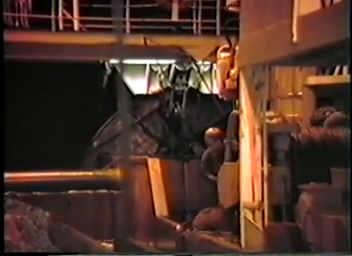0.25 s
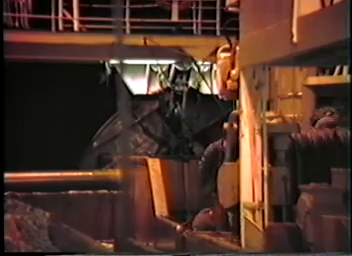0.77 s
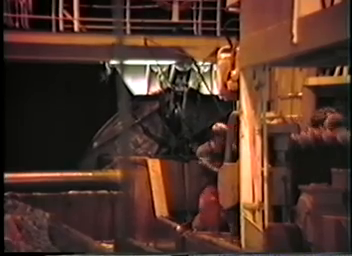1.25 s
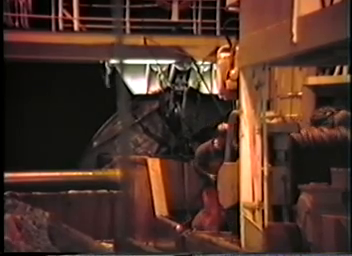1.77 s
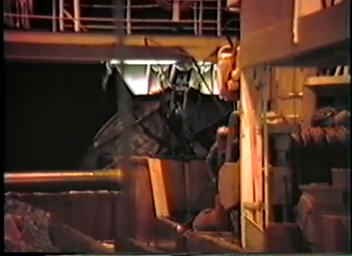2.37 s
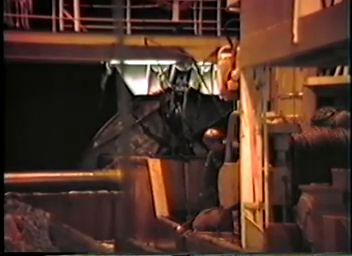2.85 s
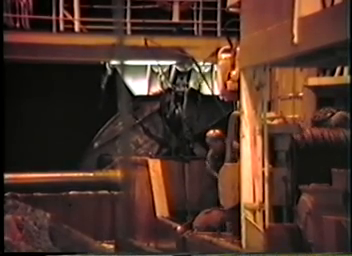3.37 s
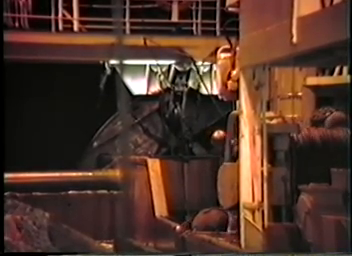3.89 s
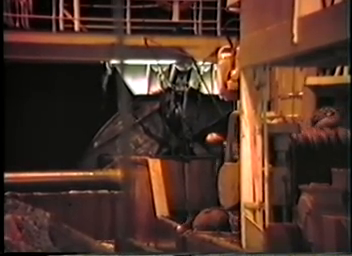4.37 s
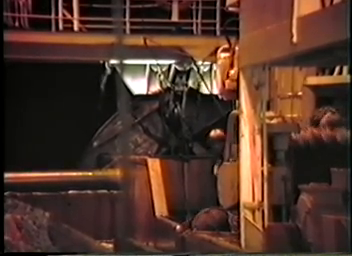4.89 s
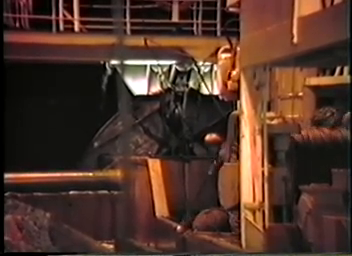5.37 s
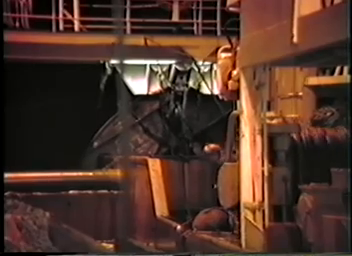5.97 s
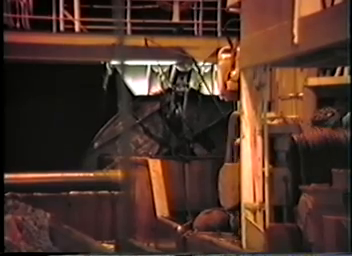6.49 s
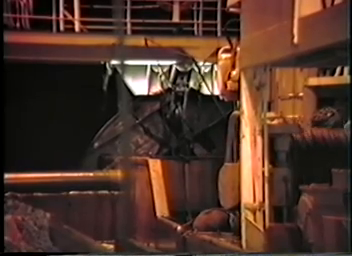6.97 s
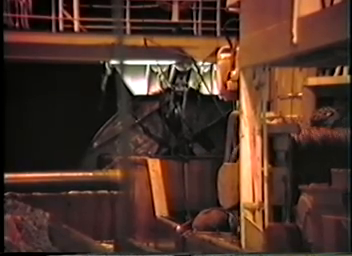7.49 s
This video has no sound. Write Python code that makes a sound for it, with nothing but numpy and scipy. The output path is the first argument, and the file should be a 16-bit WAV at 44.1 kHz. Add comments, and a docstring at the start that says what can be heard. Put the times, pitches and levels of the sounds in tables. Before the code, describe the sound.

Continuous loud ship machinery from start to end: low-mid, pipe-like exhaust throbs in a quick regular beat, with rattling clatter and cylinder rasp, shaft and gear hum, rushing air and ringing metal around them. A high, wavering pump whine pulses slightly slower than the engine. The throb grows slightly until three seconds, then eases. A few tiny ticks of loose gear barely poke through. Captured in mono from one spot on deck, slightly compressed.

```python
"""The working deck of a trawler at night, heard from one spot on deck for nearly eight seconds.
From the start the diesel throbs about four times a second, each cycle the same run of tone-and-noise puffs and
clatter. Shaped noise makes the ventilation and winch roar, bands of noise the ringing steel, and a wavering sine
the hydraulic pump, swelling three times a second. Loose gear ticks once early, once near four seconds and three
times after six, as short noise bursts. The diesel's puffs strengthen a little until three seconds, then ease off."""
import sys
import numpy as np
from scipy import signal
from scipy.fft import rfft, irfft, next_fast_len
from scipy.io import wavfile
from scipy.ndimage import uniform_filter1d, minimum_filter1d

SR = 44100
rng = np.random.default_rng(int(sys.argv[2]) if len(sys.argv) > 2 else 0)


def dump_mix(stems):
    """Bounce the given channels to the path in sys.argv[1] as a 16-bit WAV at rate SR."""
    frames = np.atleast_2d(stems).T  # one column per channel
    limited = np.clip(frames, -1, 1)  # hard clip at full scale
    pcm = np.round(limited * 32767).astype(np.int16)
    wavfile.write(sys.argv[1], SR, pcm)


N = 341334

# One engine cycle, and the time of the first heavy puff.
CYCLE_S, FIRST_THROB_S = 0.2403, 0.1248


def from_db(db):
    """Decibels to gain."""
    return 10 ** (np.asarray(db) / 20)


def seconds():
    """The time of every sample."""
    return np.arange(N) / SR


def rms_one(x):
    """Scale to an rms of 1."""
    return x / np.sqrt(np.mean(x ** 2) + 1e-20)


def sine(phase):
    """A sine of rms 1 from its phase in radians."""
    return np.sqrt(2) * np.sin(phase)


def drift(rate_hz):
    """Slow chance with a spread of 1, changing about rate_hz times a second."""
    points, step = 4096, 100  # one point every 100 samples
    hz = np.fft.rfftfreq(points, step / SR)
    slow = irfft(rfft(rng.standard_normal(points)) / (1 + (hz / rate_hz) ** 2))
    return np.interp(np.arange(N) / step, np.arange(points), rms_one(slow))


def colour(white, spectrum):
    """Give white noise of rms 1 a spectrum in dB per Hz."""
    hz = np.maximum(np.fft.rfftfreq(len(white), 1 / SR), 1)
    points_hz, points_db = np.transpose(spectrum)
    gain = from_db(np.interp(np.log(hz), np.log(points_hz), points_db)) * np.sqrt(SR / 2)
    return irfft(rfft(white) * gain, len(white))


def band(x, low_hz, high_hz):
    """Band-pass between two frequencies."""
    edges = [low_hz, min(high_hz, SR / 2 - 1)]
    return signal.sosfilt(signal.butter(2, edges, "band", fs=SR, output="sos"), x + 1e-18)


def clicks(times, sizes):
    """Single-sample impulses at the given times."""
    out = np.zeros(N)
    at = np.round(times * SR).astype(int)
    inside = (at >= 0) & (at < N)
    out[at[inside]] = sizes[inside]
    return out


# Puffs and knocks of one engine cycle, before the load changes them. Each row: time in seconds from the
# heaviest puff, pitch in Hz, peak level in dB, rise in seconds.
PUFFS = [(-.092, 413, -19, .009), (-.085, 265, -25.5, .010), (-.075, 141, -24, .008),
         (-.060, 141.5, -27, 0.0097), (-.043, 270, -20.5, 0.0085), (-.023, 171.6, -29, 0.0076),
         (-.019, 396, -14.5, 0.00694), (-.013, 719, -18, 0.00591), (-.010, 79.5, -34, .014),
         (-.003, 135, -24, 0.0087), (0, 275.7, -9, 0.00761), (.020, 139, -22.5, 0.00885),
         (.020, 404, -16, 0.00546), (.039, 92, -24.5, 0.02176), (.079, 283, -24.5, 0.00894),
         (.112, 101.3, -32.5, 0.0156)]
# How hard the engine pulls. Each row: time in seconds, strength of the puffs in dB.
ENGINE_LOAD = [(0, -0.6), (3, .7), (7.7, -1.4)]
THROB_SCATTER_DB = .5  # no two cycles burn quite alike


def exhaust(uneven_db, rough):
    """Each puff is a pipe tone and turbulent gas that swell and die; the run repeats every engine cycle."""
    times = np.arange(FIRST_THROB_S, N / SR + CYCLE_S, CYCLE_S)
    load_db = np.interp(times, *np.transpose(ENGINE_LOAD))
    strength_db = load_db + THROB_SCATTER_DB * rng.standard_normal(len(times))
    t = np.arange(SR // 8) / SR
    out = np.zeros(N)
    for offset, hz, peak_db, rise in PUFFS:
        # reaches 1 after the rise, so each stroke starts that much early
        swell = (t / rise * np.exp(1 - t / rise)) ** 3
        sizes = from_db(peak_db + strength_db + uneven_db * rng.standard_normal(len(times)))
        strokes = clicks(times + offset - rise, sizes)
        # turbulent gas makes every stroke a little different
        gas = rough * rms_one(band(rng.standard_normal(N), hz * 0.81, hz * 1.36))
        out += signal.oaconvolve(strokes, swell * np.sin(2 * np.pi * hz * t))[:N]
        out += signal.oaconvolve(strokes, swell)[:N] * gas
    return out


# Resonances of the exhaust pipe, ringing on between puffs. Each row: pitch in Hz, width in Hz,
# level in dB against the puffs.
PIPE = [(97.6, 5.3, -9.5), (256.7, 15.3, 3), (297, 4.5, -3.5), (333.4, 17, 3.5)]


def pipe(puffs):
    """The puffs together with the ringing that they leave in the pipe."""
    out = puffs
    for hz, width, level_db in PIPE:
        ringing = signal.lfilter(*signal.iirpeak(hz, hz / width, fs=SR), puffs)
        out = out + from_db(level_db) * ringing
    return out


# The rest of the cycle's clatter, before its level and surge. Each row: frequency in Hz, density in dB per Hz.
VALVE_CLATTER = [(30, -76), (50, -61), (70, -62), (95, -53), (140, -50), (180, -47), (260, -48.5),
                 (340, -43), (500, -52.6), (780, -46), (1100, -71), (2000, -72), (4000, -91.5),
                 (8000, -112)]


def clatter(level_db, surge_db):
    """Valves and pistons make the same dense clatter in every cycle, loudest round the heavy puff."""
    size = round(CYCLE_S * SR)
    # flat spectrum, random phases: one cycle of noise that joins its own start
    even = rms_one(irfft(np.exp(2j * np.pi * rng.random(size // 2 + 1)), size))
    one_cycle = colour(even, VALVE_CLATTER)
    load = np.cos(2 * np.pi * (seconds() - FIRST_THROB_S) / CYCLE_S)
    return np.resize(one_cycle, N) * from_db(level_db + surge_db * load)


# Shaft and gear tones. Each row: multiple of the cycle rate, rms level in dB before it wavers.
SHAFT_ORDERS = [(12, -49), (17, -49), (23, -38), (30, -42), (34, -39), (192, -31), (226, -36), (452, -44)]


def shafts(waver_db):
    """Tones locked to the engine's speed, wavering a little in strength."""
    turns = seconds() / CYCLE_S
    out = np.zeros(N)
    for order, level_db in SHAFT_ORDERS:
        level = from_db(level_db + waver_db * drift(1.16))
        out += level * sine(2 * np.pi * (order * turns + rng.random()))
    return out


CYLINDERS = 6


def firings(level_db, low_hz, high_hz, lead_s, surge_db):
    """Every cylinder fires once a cycle with a short rasp, roughest just before the heavy puff."""
    turn = 2 * np.pi * (seconds() - FIRST_THROB_S + lead_s) / CYCLE_S
    gate = (.5 + .5 * np.cos(CYLINDERS * turn)) * from_db(surge_db * np.cos(turn))
    return from_db(level_db) * rms_one(gate * band(rng.standard_normal(N), low_hz, high_hz))


# Ventilation and winch machinery, before level and flutter. Each row: frequency in Hz, density in dB per Hz.
DECK_ROAR = [(20, -71.6), (36, -71), (50, -78), (130, -56), (215, -59), (400, -47), (780, -45),
             (1050, -50.5), (1900, -55), (2600, -61), (4100, -66.5), (5400, -83.5), (8000, -92),
             (14000, -99)]
# Ducts and plating that the machinery keeps ringing. Each row: pitch in Hz, width in Hz, rms level in dB.
STEEL = [(253, 11.4, -29), (296.7, 8.9, -32), (337, 21, -34.5), (390.6, 5.1, -29), (499.2, 6.2, -29),
         (609.7, 45, -22), (822, 10, -33.5), (1868, 19, -42), (3610, 310, -45), (4280, 330, -48),
         (4980, 250, -55.5), (6180, 810, -60)]


def machinery(roar_db, flutter_db):
    """Rushing air and gear noise, with resonances of the steel standing out of it as bands of noise."""
    white = rng.standard_normal(next_fast_len(N))
    out = colour(white, DECK_ROAR)[:N] * from_db(roar_db + flutter_db * drift(5.0))
    for hz, width, level_db in STEEL:
        # half a second of run-up, so the steel already rings at the start
        ringing = band(rng.standard_normal(N + SR // 2), hz - width / 2, hz + width / 2)[-N:]
        out = out + from_db(level_db) * rms_one(ringing)
    return out


# The pump's mean pitch, and the steady rate and first top of its swells.
PUMP_HZ, SWELLS_PER_S, FIRST_SWELL_S = 2255, 3.149, .035


def pump(peak_db, dip_db, uneven_db, wander_hz, rough):
    """A thin, quivering whine with a rough edge that swells about three times a second: round tops, short dips."""
    swell = np.abs(np.cos(np.pi * SWELLS_PER_S * (seconds() - FIRST_SWELL_S)))
    level = from_db(peak_db - dip_db * (1 - swell) + uneven_db * drift(1.7))
    hz = PUMP_HZ + wander_hz * drift(20.2)
    edge = rough * rms_one(band(rng.standard_normal(N), PUMP_HZ - 30, PUMP_HZ + 30))
    return level * (sine(2 * np.pi * np.cumsum(hz) / SR) + edge)


# Ticks of loose gear on deck. Each row: start in seconds, level in dB against the other ticks.
TICKS = [(0.3775, -33), (3.9594, -34), (6.33, -37), (6.556, -38), (7.6226, -40)]


def loose_gear(level_db, decay_s, low_hz, high_hz):
    """Short bright metal ticks: bursts of high noise that die exponentially."""
    times, tick_db = np.transpose(TICKS)
    strikes = clicks(times, from_db(tick_db + level_db))
    envelope = signal.lfilter([1], [1, -np.exp(-1 / (decay_s * SR))], strikes)
    return envelope * rms_one(band(rng.standard_normal(N), low_hz, high_hz))


def scene():
    """Engine, deck machinery, pump and loose gear, heard from one spot on deck by one microphone."""
    engine = pipe(exhaust(uneven_db=0.76, rough=0.18))
    engine = engine + clatter(level_db=-4.5, surge_db=2.0) + shafts(waver_db=3.5)
    rasp = firings(level_db=-29, low_hz=443, high_hz=900, lead_s=.012, surge_db=3.0)
    deck = machinery(roar_db=-0.7, flutter_db=0.55)
    whine = pump(peak_db=-30.4, dip_db=10, uneven_db=.6, wander_hz=11, rough=.4)
    ticks = loose_gear(level_db=-10, decay_s=.003, low_hz=4500, high_hz=9150)
    return (engine + rasp + deck + whine + ticks)[None]


def limiter(x, ceiling, size):
    """The gain ducks smoothly round any peak that would pass the ceiling; size is in samples."""
    gain = minimum_filter1d(ceiling / np.maximum(np.abs(x), ceiling), 2 * size + 1)
    return x * uniform_filter1d(uniform_filter1d(gain, size), size)


# Thin electrical whine of the recorder. Each row: pitch in Hz, rms level in dB.
RECORDER_WHINE = [(9001, -77), (9598, -78), (10799, -79), (11402, -78), (11999, -80), (13200, -81),
                  (13803, -83)]
CUTOFF_HZ = 14300


def record(dry):
    """The recorder holds the highest peaks down, adds its thin whine and cuts the top."""
    held = limiter(dry, ceiling=.89, size=128)
    whine = sum(from_db(level_db) * sine(2 * np.pi * hz * seconds()) for hz, level_db in RECORDER_WHINE)
    soft_ends = signal.windows.tukey(N, .001)
    # steep low-pass: 0.1 dB ripple below the cutoff, 90 dB down above it
    top_cut = signal.ellip(14, .1, 90, CUTOFF_HZ, fs=SR, output="sos")
    return signal.sosfilt(top_cut, (held + whine) * soft_ends)


dry = scene()
out = record(dry)
dump_mix(out)
```